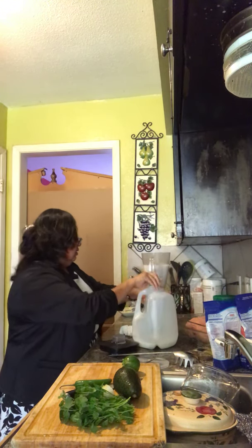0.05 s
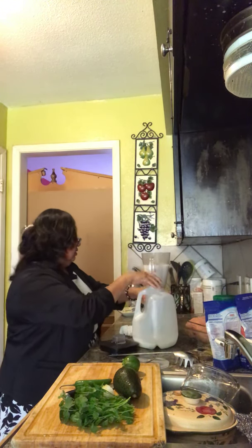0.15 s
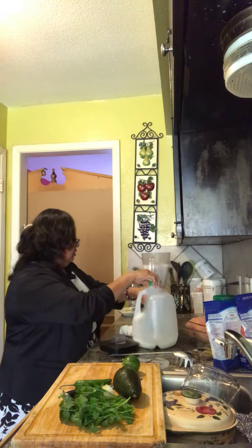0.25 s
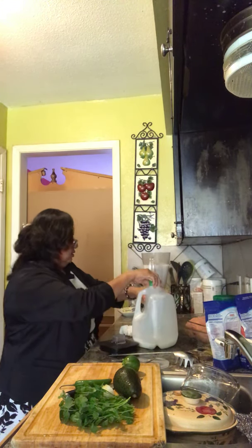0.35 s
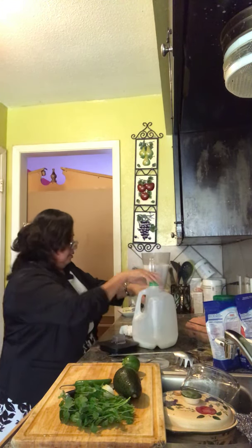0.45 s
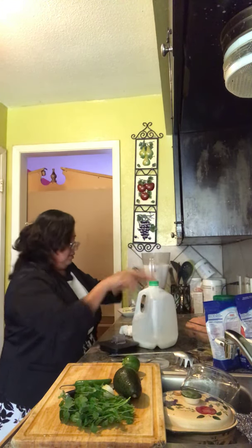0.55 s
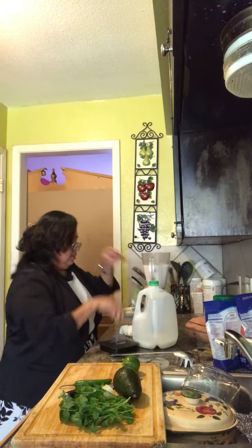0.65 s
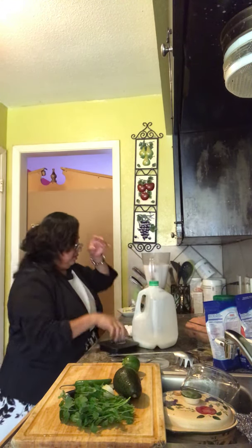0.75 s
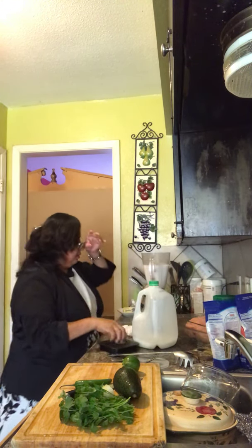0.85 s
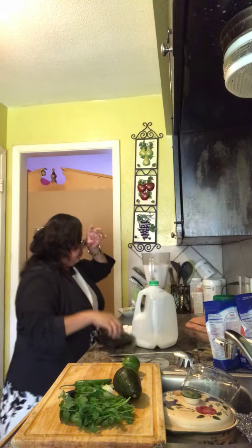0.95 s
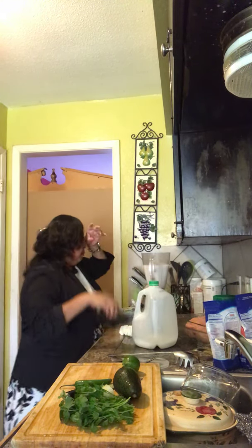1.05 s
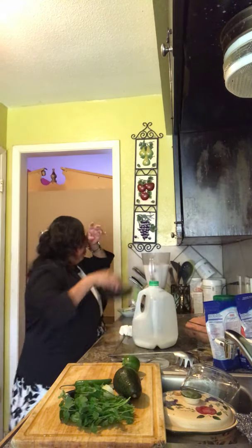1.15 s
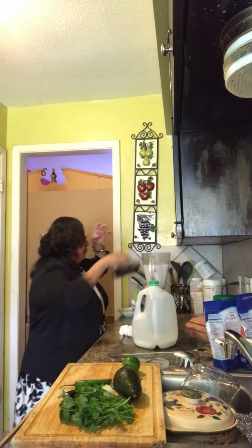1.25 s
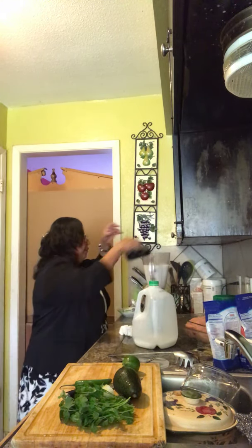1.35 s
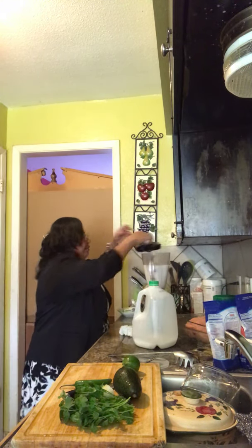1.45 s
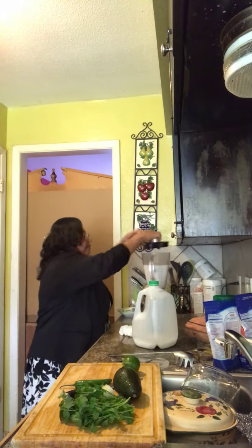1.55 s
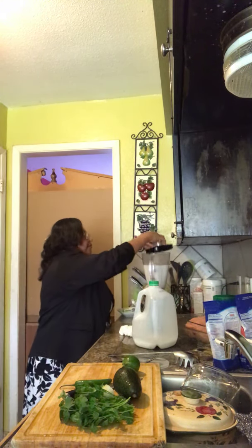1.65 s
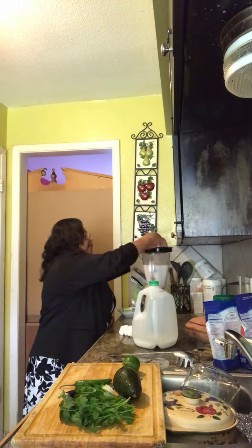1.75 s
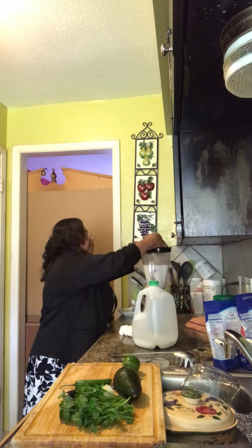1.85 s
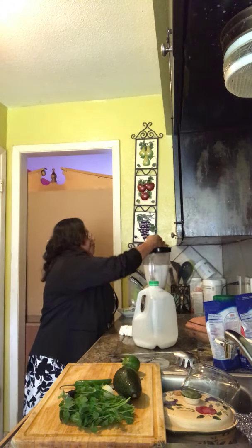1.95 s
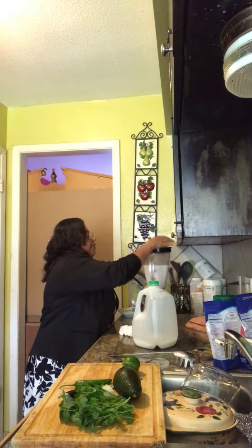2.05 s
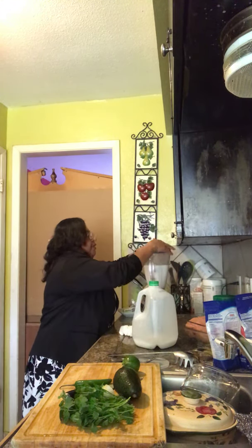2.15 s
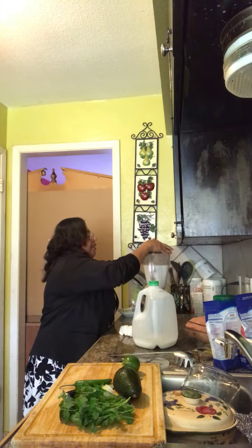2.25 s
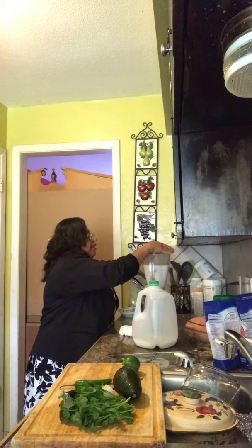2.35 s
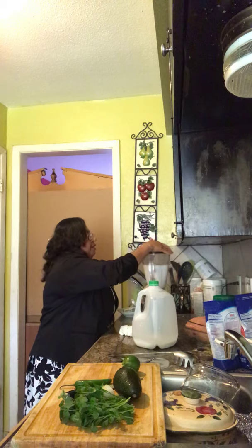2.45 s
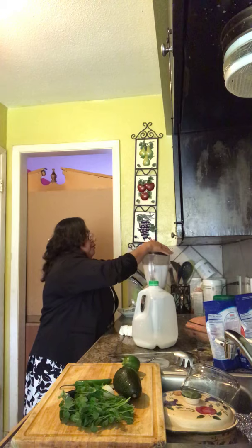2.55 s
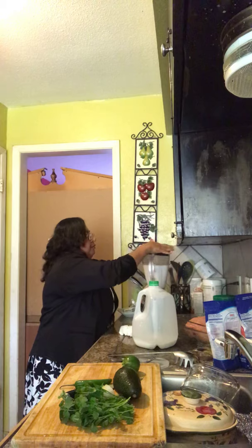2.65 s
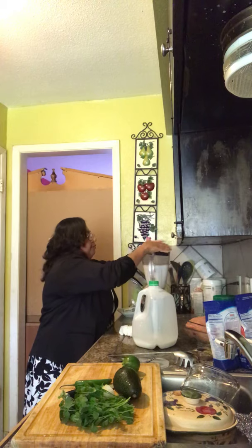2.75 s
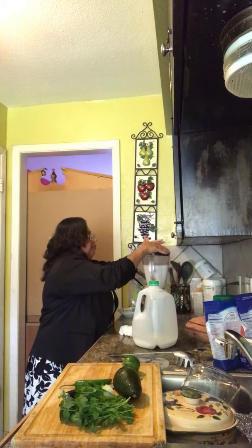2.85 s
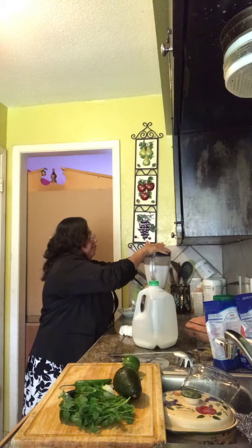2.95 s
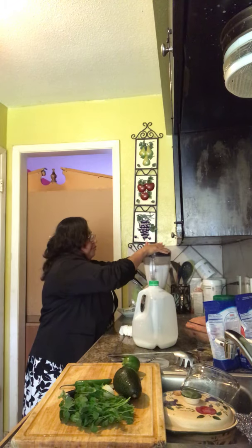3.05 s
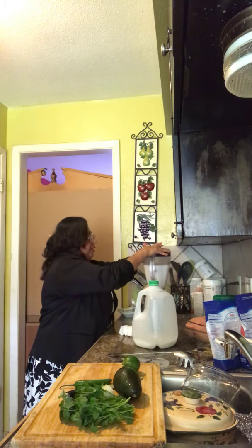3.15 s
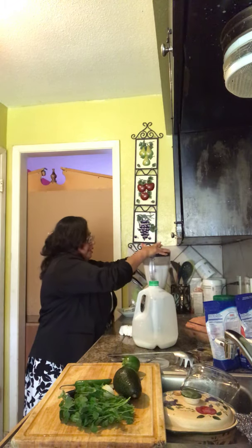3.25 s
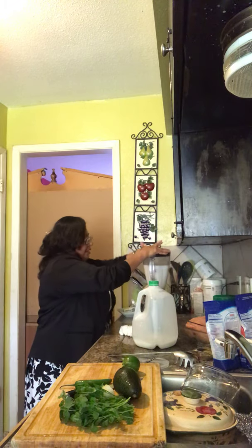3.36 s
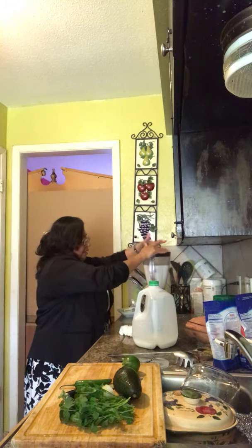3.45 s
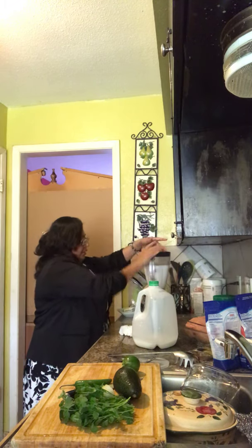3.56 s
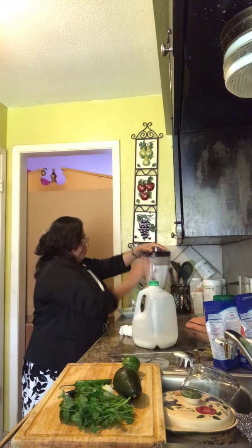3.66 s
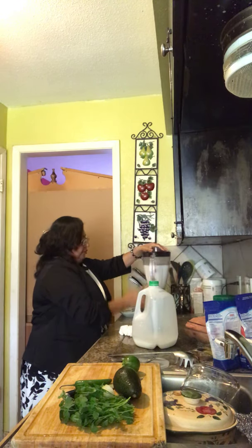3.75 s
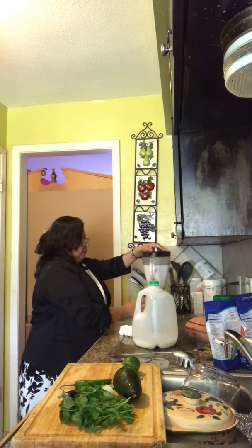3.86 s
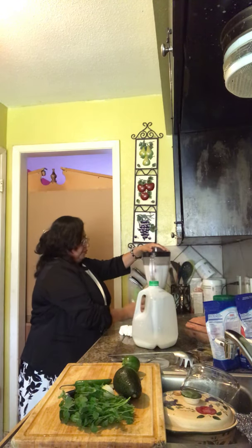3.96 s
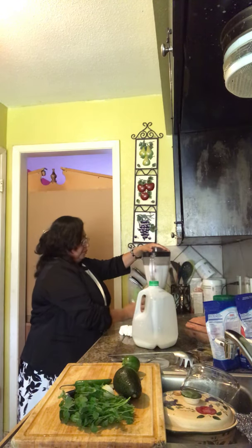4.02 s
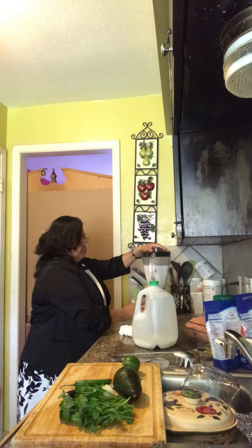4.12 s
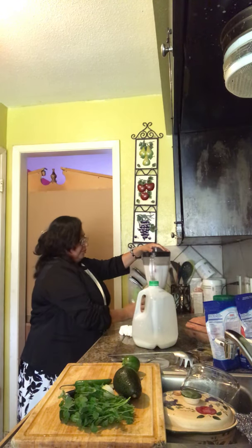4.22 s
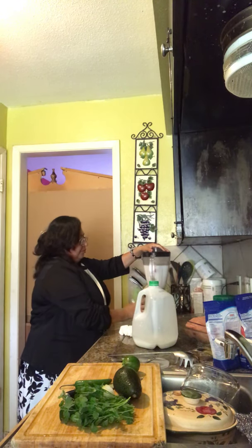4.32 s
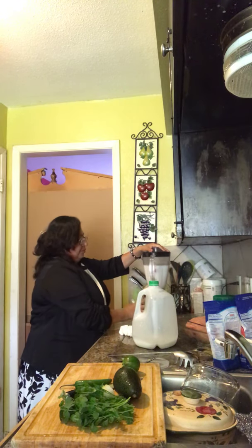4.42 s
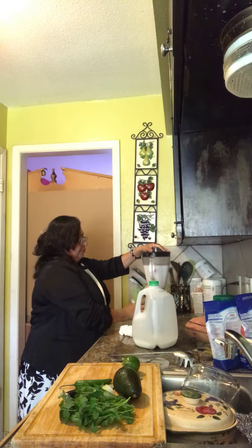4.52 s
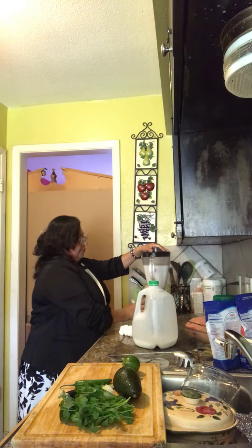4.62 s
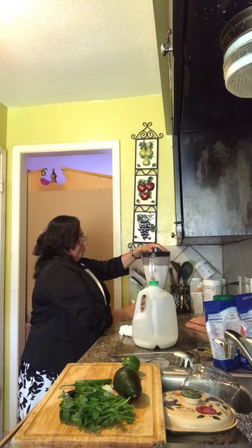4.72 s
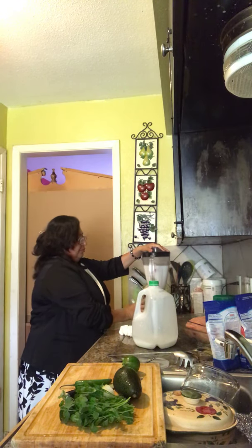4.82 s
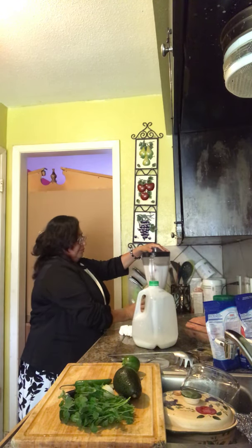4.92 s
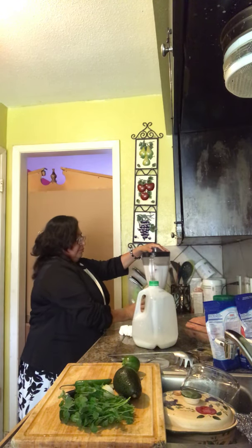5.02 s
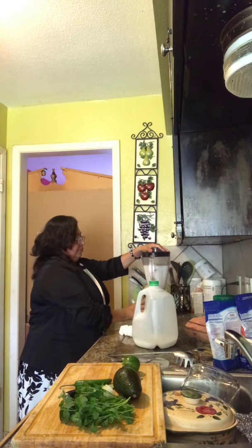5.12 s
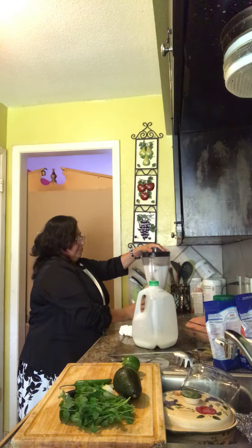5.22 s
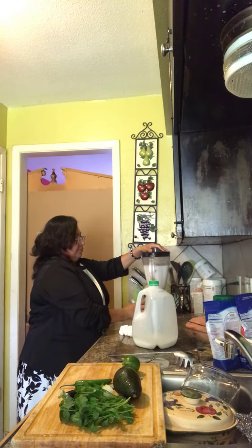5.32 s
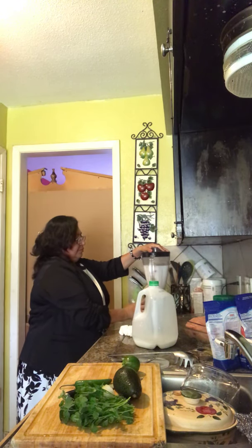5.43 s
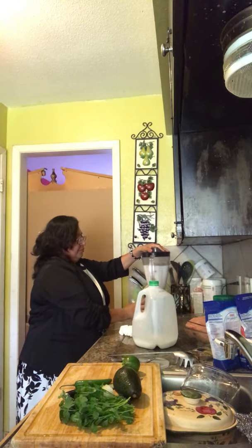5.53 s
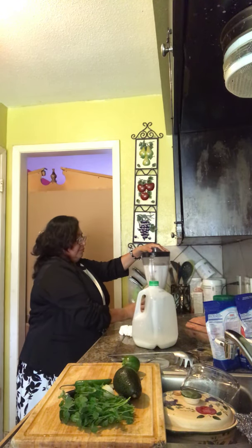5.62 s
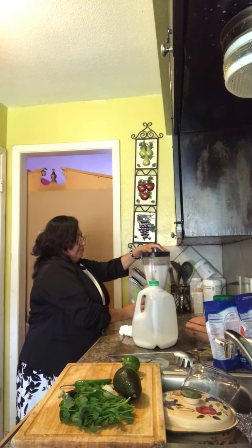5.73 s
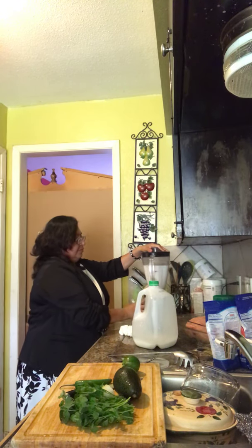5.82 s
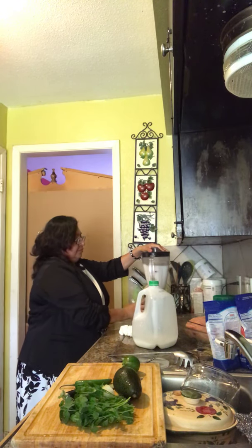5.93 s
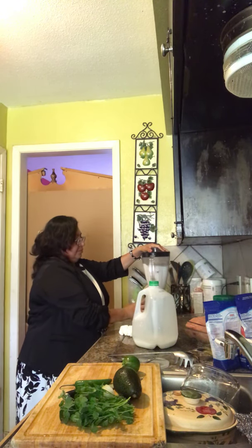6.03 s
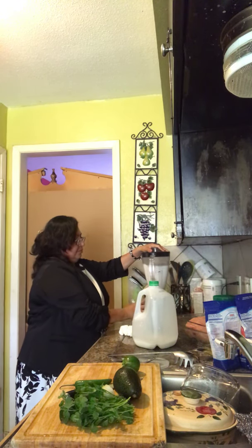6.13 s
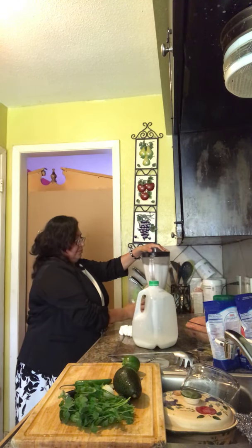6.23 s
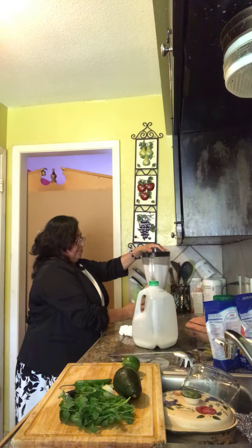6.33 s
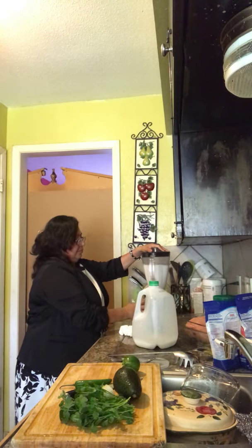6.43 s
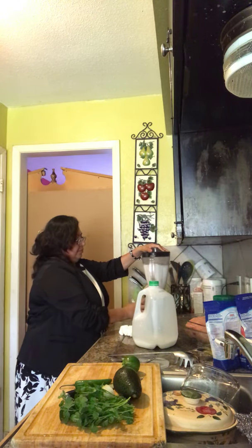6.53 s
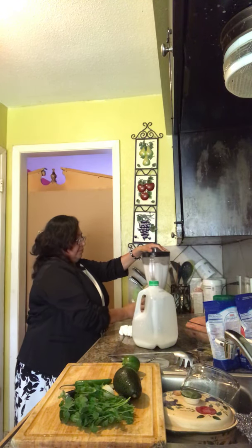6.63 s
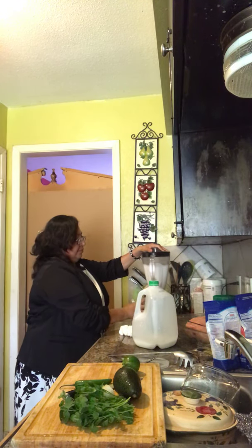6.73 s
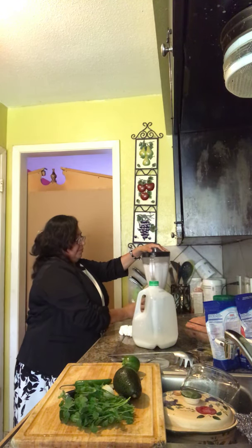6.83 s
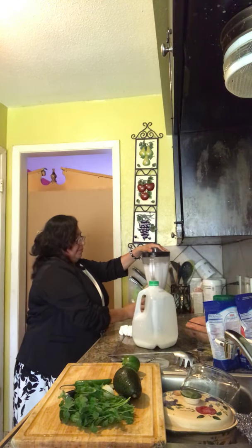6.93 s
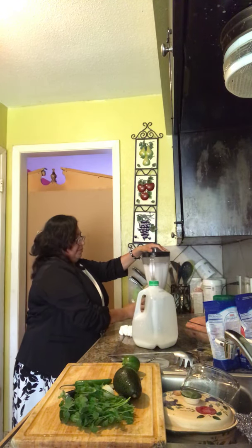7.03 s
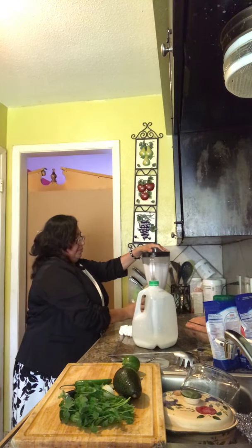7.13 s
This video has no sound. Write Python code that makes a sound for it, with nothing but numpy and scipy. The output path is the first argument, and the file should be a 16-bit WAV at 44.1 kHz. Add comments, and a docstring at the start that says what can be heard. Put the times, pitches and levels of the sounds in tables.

```python
"""A small kitchen, heard by a mono phone microphone. Hands rustle, slide a lid off the worktop and
press it onto a plastic blender jar, which knocks hollowly. Piano-key switches snap and the motor steps
through three speeds: mains buzz, shaft beats, brush whirr in the housing and, loudest at the end,
the blades churning the jar's contents. Under it all, house rumble and a fridge drone."""
import sys
import numpy as np
from scipy import signal
from scipy.fft import rfft, irfft, next_fast_len
from scipy.io import wavfile
from scipy.ndimage import uniform_filter1d

SR = 44100
rng = np.random.default_rng(int(sys.argv[2]) if len(sys.argv) > 2 else 0)


def wav_record(signal):
    """Record a signal, one row per channel, as 16-bit PCM in the file named by sys.argv[1]."""
    frames = np.transpose(np.atleast_2d(signal))
    bounded = np.clip(frames, -1, 1)
    # unit amplitude maps onto the largest positive 16-bit level
    quanta = np.round(bounded * 32767).astype(np.int16)
    wavfile.write(sys.argv[1], SR, quanta)


N = 316638

# power on, three speeds, mix drops onto the blades:
# t/s, settling/s, then level/dB of whirr, churn, buzz, overtones, shaft beat, boom
MOTOR_STEPS = [(4.7, 0.022, -54.5, -46, -46, -55, -44.5, -65),
               (4.79, 0.02, -49.5, -48, -45.5, -59.5, -53.5, -57.5),
               (5.5, 0.029, -43, -41.5, -41.5, -65.5, -40.5, -56.5),
               (6.6, 0.025, -39.5, -34, -39, -63, -36.5, -45.5),
               (6.755, 0.05, -35.5, -25, -50, -60, -40, -38)]
# swells and dips, most as lumps load the blades: t/s, half-width/s, gain/dB of churn, buzz, beat, boom
LOAD_LUMPS = [(5.3, 0.025, 7, 2, 5, 0), (5.46, .05, 6.5, 0, 7, -3), (5.72, 0.018, 2.5, 3.5, 1, 7),
              (5.78, 0.039, 3, -14, -1, 12), (5.87, 0.025, 4.5, 9, 2, 8), (6.32, 0.25, 3.5, -0.5, 1, 3.5),
              (6.74, 0.035, -2.5, -9, -0.5, -1.5), (6.92, 0.12, 0.5, 8, 4.5, 10)]


def motor():
    """Six layers settle to each step's levels; the slow blades labour once a turn until second speed."""
    t = np.arange(N) / SR
    levels_db = np.full((6, N), -90.)  # stopped
    for s, settle_s, *goal_db in MOTOR_STEPS:
        i = int(s * SR)
        goal = np.c_[goal_db]
        levels_db[:, i:] = goal + (levels_db[:, i:i + 1] - goal) * np.exp(-(t[i:] - s) / settle_s)
    for s, width_s, *gain_db in LOAD_LUMPS:
        levels_db[[1, 2, 4, 5]] += np.c_[gain_db] * np.exp(-((t - s) / width_s) ** 2)
    whirr_db, churn_db, buzz_db, overtone_db, beat_db, boom_db = levels_db
    throb_hz, crest_s, second_speed_s = 13.73, 5.3, MOTOR_STEPS[2][0]
    throb = np.cos(2 * np.pi * throb_hz * (t - crest_s)) * (t < second_speed_s)
    return (undb(whirr_db + 2 * throb) * brush_whirr()
            + undb(churn_db) * blade_churn()
            + mains_buzz(buzz_db + 2 * throb, overtone_db + 4 * throb)
            + undb(beat_db) * shaft_beat()
            + undb(boom_db) * jar_boom())


# churn spectrum: f/Hz, density/dB
CHURN_SPECTRUM = [(24, -49), (40, -30), (85, -13), (264, -5), (377, -13), (455, -8), (561, -7),
                  (1190, -2.5), (1410, -2), (2100, -5.5), (2290, -9), (3700, -11), (6000, -22.5),
                  (7800, -52), (13200, -120)]
# loaded jar resonances: f/Hz, width/Hz, gain/dB
FULL_JAR_MODES = [(526, 25, 1), (780, 40, 1), (1195, 70, 2), (1566, 40, 3), (1790, 90, 0), (2046, 45, 4),
                  (2551, 40, 2), (3602, 25, 4), (3848, 40, 3)]


def blade_churn():
    """Blades churn the mix: coarse, flickering noise through the loaded jar."""
    return resonate(colour(grit(3.44), CHURN_SPECTRUM, flicker_db=1.43, rate_hz=70), FULL_JAR_MODES)


# brush spectrum: f/Hz, density/dB
BRUSH_SPECTRUM = [(240, -71), (400, -5), (838, -10), (1180, -6), (2020, -20), (2210, -27), (2540, -13.5),
                  (3980, -8), (4370, -11), (5850, -9.5), (10400, -23), (12500, -18.5), (14500, -23.5),
                  (15900, -30)]
# housing resonances: f/Hz, width/Hz, gain/dB
HOUSING_MODES = [(1570, 90, 1), (2555, 130, 3), (3835, 50, 4), (4120, 60, 3), (4630, 50, -2),
                 (5020, 120, -1), (5630, 40, -1), (5880, 130, 5), (6590, 50, -1), (7110, 45, -1),
                 (7800, 100, 3), (8410, 90, 1), (8940, 160, 0), (13700, 120, -2)]
# whistle envelope: t/s, level/dB re whirr
WHISTLE_LEVELS = [(4.8, -26), (5.45, -22), (5.6, -16.5), (6.5, -15.5), (6.7, -22), (7.18, -25)]


def brush_whirr():
    """Brushes whirr in the housing, with a high whistle on top."""
    whirr = resonate(colour(grit(0.97), BRUSH_SPECTRUM, flicker_db=0.3, rate_hz=25), HOUSING_MODES)
    whistle = unit(band(grit(0.97), 12270, 210))
    return whirr + undb(curve(WHISTLE_LEVELS)) * whistle


# buzz overtones: harmonic number, level/dB
BUZZ_OVERTONES = [(2, 4), (3, 4.5), (4, -9), (5, 8)]


def mains_buzz(buzz_db, overtone_db, buzz_hz=120):
    """The field buzzes at twice the mains frequency; level and phase waver."""
    phase = 2 * np.pi * buzz_hz * np.arange(N) / SR
    overtones = sum(undb(db + 1.7 * walk(60)) * np.sin(k * phase + 0.77 * walk(40))
                    for k, db in BUZZ_OVERTONES)
    fundamental = undb(buzz_db + 2 * walk(25)) * np.sin(phase + .5 * walk(20))
    return fundamental + undb(overtone_db) * overtones


# worktop resonances: f/Hz, width/Hz, level/dB
WORKTOP_MODES = [(64, 9, -2), (167, 37, 2), (274.4, 56, 6)]


def shaft_beat(shaft_hz=40.4):
    """One uneven beat a turn, over a loose rumble, shakes the worktop."""
    turns = np.cumsum(shaft_hz * (1 + 0.01038 * walk(6))) / SR
    beats = np.diff(np.floor(turns), prepend=0) * undb(0.63 * rng.standard_normal(N))
    shake = unit(beats) + undb(3.5) * rng.standard_normal(N)
    return unit(sum(undb(db) * steep(shake, hz, 1.5 * width) * np.sqrt(50 / width)
                    for hz, width, db in WORKTOP_MODES))


def jar_boom():
    """The air over the mix booms in one low band."""
    return unit(steep(grit(3.0), 451, 109))


# finger taps and switch snaps: t/s, level/dB, f/Hz, thump/dB rel., snap/dB rel., t60/s
BASE_CLICKS = [(0.172, -49, 2140, -19, -16, 0.045), (0.2833, -50, 1400, -24, -6, 0.08),
               (3.4639, -48.5, 1690, 2, -6, 0.048), (3.523, -56, 1200, -21, -11, 0.067),
               (3.601, -57, 1980, -13, 2, 0.098), (3.8364, -60, 1150, -4, -0.5, 0.2),
               (3.9303, -46, 1560, -6, -9, 0.046), (3.953, -60, 1500, -15, -25, 0.036),
               (3.973, -50.5, 1900, -16, -9, 0.052), (4.0123, -35, 1290, -36, -36, 0.036),
               (4.186, -52, 3520, -22, -16, 0.081), (4.2215, -43, 3300, -18, -8, 0.047),
               (4.243, -53, 3550, -20, -20, 0.05), (4.361, -46.5, 1900, -3, -12, 0.045),
               (4.435, -47, 1550, -23, -27, 0.049), (4.636, -48, 1580, -10, -25, 0.046),
               (4.691, -37, 2120, -5, -1, 0.096), (4.704, -36.5, 3020, -19, -2, 0.059),
               (4.712, -29, 1170, -7, -27, 0.053), (4.782, -22.5, 3620, -1.5, 2.5, 0.058),
               (5.4991, -18, 2340, -12.5, -4.5, 0.033), (5.506, -24.5, 2070, -6, -1, 0.05),
               (5.7244, -29, 2400, -18, -20, 0.067), (6.5945, -19, 1440, -6.5, 0.5, 0.04)]
# motor base resonances: f/Hz, width/Hz, gain/dB
BASE_MODES = [(553, 360, 12), (1120, 60, 5), (1560, 140, 7.5), (2620, 150, 3.5), (3510, 62, -5.5),
              (5150, 430, -3.5)]
# ringing keys and plastic parts: t/s, peak/dB, f/Hz, t60/s
KEY_PINGS = [(3.931, -53, 1540, 0.02), (4.014, -45, 1150, .015), (4.243, -52, 3560, 0.027),
             (4.436, -46, 1480, 0.014), (4.637, -50, 1630, .012), (4.7828, -19, 1610, 0.014),
             (5.4995, -25, 1630, .015), (5.723, -33, 2040, .02), (6.5945, -27, 3850, .012)]


def clicks():
    """Taps and switches rattle the plastic base and thump the worktop; small parts ping."""
    out = np.zeros(N)
    thump = blow([(314, 0, 0.081)], push_s=0.005)
    for s, db, hz, thump_db, snap_db, t60_s in BASE_CLICKS:
        rattle = burst(t60_s, rise_s=0.0018)
        body = steep(rattle, hz, 2 * hz) + steep(rattle, hz, 0.33 * hz)
        clack = undb(-1.5) * body + undb(snap_db) * band(rattle, 2300, 5800)
        base = sum(undb(gain_db) * band(clack, f, width) for f, width, gain_db in BASE_MODES)
        add(out, s, undb(db) * (clack + undb(-3.5) * base + undb(thump_db) * thump))
    for s, db, hz, t60_s in KEY_PINGS:
        add(out, s, undb(db) * blow([(hz, 0, t60_s)], push_s=0.0016))
    return out


# lid and hand on the jar: t/s, level/dB, hollow f/Hz, thud/dB rel., crack/dB rel.
JAR_KNOCKS = [(0.428, -36, 674, -9.5, -27), (0.693, -40.5, 500, -2, -27), (0.773, -42, 607, -5.5, -13),
              (0.853, -46, 515, -24, -28), (0.896, -43, 602, -17, -18), (1.717, -34.5, 650, -5.5, -23),
              (1.75, -20.5, 639, -36, -48), (1.775, -38, 683, -22, -31), (1.808, -33.5, 674, -23, -21),
              (1.85, -33.5, 633, -22, -27), (1.866, -25, 597, -14, -31), (1.889, -36, 660, -22, -29),
              (1.924, -40, 630, -22, -28), (2.045, -32, 626, -11, -31), (2.071, -42, 660, -27, -27),
              (2.228, -34.5, 610, -27, -10.5), (2.269, -39, 606, -5.5, -15), (2.312, -34.5, 575, -4, -30),
              (2.475, -39.5, 510, -12, -9), (2.485, -33.5, 602, -11, -28), (2.509, -34, 470, -18, -30),
              (2.525, -25.5, 640, -9, -19.5), (2.545, -33.5, 633, -20, -28), (2.565, -28.5, 617, -7.5, -30),
              (2.706, -36, 396, -18, -23), (2.948, -33.5, 570, 1.5, -23), (2.966, -36, 620, -3, -20),
              (2.99, -34, 660, -6, -11), (3.166, -44, 640, 1, 0), (3.398, -44, 445, 0, -6),
              (3.703, -37, 484, -2, -16)]
# jar modes: ratio to hollow pitch, level/dB, t60/s
JAR_MODES = [(.97, 11.5, 0.011), (1.04, -11, 0.073), (1.0, 6, 0.026), (.45, -4, 0.04), (.75, -21, 0.03),
             (1.8, -20, 0.014), (2.55, -15, 0.02)]


def knocks(palm_s=.012):
    """Soft, scuffing blows ring the air and walls of the jar; each hold gives another pitch."""
    out = np.zeros(N)
    for s, db, hz, thud_db, crack_db in JAR_KNOCKS:
        ring = blow([(hz * ratio, mode_db, t60_s) for ratio, mode_db, t60_s in JAR_MODES], palm_s)
        ring *= undb(-1.5 - .7 * max(thud_db + 16, 0))  # a flat hand thuds more and damps the ring
        scuff = undb(7) * band(burst(0.038, palm_s / 2), hz, 320)
        thud = undb(thud_db) * peak(steep(burst(0.081, palm_s / 2), 350, 590))
        crack = undb(crack_db) * peak(steep(burst(0.023, 0.0013), 3600, 8300))
        add(out, s - .6 * palm_s, undb(db) * (ring + scuff + thud))  # the palm presses before the crack
        add(out, s, undb(db) * crack)
    return out


# hand, sleeve and lid strokes: peak t/s, rise/s, fall/s, level/dB, f/Hz, sizzle/dB rel., drag/dB rel.
RUB_STROKES = [(0.02, 0.14, 0.14, -61, 3850, -14, -1), (0.11, 0.082, 0.082, -62, 3600, -17, 3),
               (0.18, .05, .06, -70, 3500, -19, -7), (0.3, 0.065, 0.063, -53.5, 3460, -18, -2.5),
               (0.42, 0.03, 0.11, -59.5, 3900, -16, 6), (0.5, 0.058, 0.045, -63, 3650, -11, -6),
               (0.6, 0.086, 0.11, -63.5, 4600, -13, -7), (0.9, 0.08, 0.045, -61.5, 3360, -16, 0),
               (1.22, 0.037, 0.35, -58, 3000, -13, -6), (1.3, 0.11, 0.2, -62, 5400, -10, 0),
               (1.56, 0.1, 0.18, -58.5, 4630, -7, -5), (1.62, 0.16, 0.076, -53, 4930, -8, -3),
               (1.863, 0.017, 0.045, -50, 4800, -17, 7), (1.9, .05, 0.25, -66, 4000, -18, 2),
               (2.06, 0.092, 0.16, -67, 3450, -21, 7), (2.15, 0.076, 0.26, -65, 3400, -9, -3),
               (2.222, 0.01, 0.03, -56, 5200, -2, 6), (2.32, .1, .07, -69, 3400, -12, -2),
               (2.52, 0.14, 0.18, -62.5, 4020, -9, 4), (2.79, .012, 0.033, -65, 5380, -8, -14),
               (2.955, 0.02, 0.073, -49.5, 4840, -12, 0), (3.0, .03, 0.071, -55, 4170, -19, -2),
               (3.085, 0.042, 0.17, -56, 5400, -10, -1), (3.17, 0.016, 0.079, -51.5, 3970, -11, -1),
               (3.27, .1, .3, -65, 4000, -12, -3), (3.36, 0.11, 0.048, -58, 3600, -18, -1),
               (3.402, 0.0079, 0.063, -55.5, 4500, -16, -1.5), (3.447, 0.0089, .06, -55, 5000, -4, -8),
               (3.47, .01, 0.055, -56.5, 5000, -10, -3), (3.497, .01, .06, -55, 5000, -6, -7),
               (3.527, 0.022, 0.054, -55, 5000, -9, -2.5), (3.577, 0.0093, .06, -57.5, 4800, -6, -5),
               (3.605, .01, 0.066, -58.5, 4600, -8, -1.5), (3.7, .015, 0.086, -58, 5250, -12, -6),
               (3.85, 0.12, 0.3, -67, 3870, -16, 2)]


def rustle(slope_db=20, rounding=.3):
    """Cloth and skin friction: strokes of crackling noise, with sizzle above and drag below."""
    s, rise_s, fall_s, db, hz, sizzle_db, drag_db = np.transpose(RUB_STROKES)[:, :, None]
    t = np.arange(N) / SR - s
    from_peak = np.maximum(-t / rise_s, t / fall_s)
    swells = undb(db - 3 - slope_db * (np.hypot(from_peak, rounding) - rounding))

    def envelope(gain_db):
        """Power sum of the strokes, each at its own gain."""
        return np.sqrt(undb(2 * gain_db).T @ swells ** 2)[0]

    rub = sum(envelope(-4 - 20 * np.log2(hz / f) ** 2) * unit(steep(grit(2.3), f, 0.81 * f))
              for f in 2100 * 1.32 ** np.arange(5))
    sizzle = envelope(sizzle_db) * unit(steep(grit(4.3), 13300, 6200))
    drag = envelope(drag_db) * unit(steep(grit(2.6), 1040, 1280))
    flicker = undb(.4 * walk(30) + walk(130))
    return flicker * (rub + sizzle + drag)


# lid resonances: f/Hz, width/Hz, gain/dB
LID_MODES = [(4800, 1400, 0), (5750, 1400, -1), (3030, 600, -3)]


def lid_slide(peak_s=1.277, rise_s=0.065, fall_s=0.1, level_db=-58):
    """The lid slides off the worktop: a smooth hiss through its resonances."""
    t = np.arange(N) / SR - peak_s
    swell = np.exp(-(t / np.where(t < 0, rise_s, fall_s)) ** 2)
    hiss = sum(undb(db) * steep(rng.standard_normal(N), hz, width) for hz, width, db in LID_MODES)
    return undb(level_db) * swell * unit(hiss)


# rumble and hiss spectrum: f/Hz, density/dB
ROOM_SPECTRUM = [(15, -57), (25, -9), (87, -4.5), (161, 1), (190, -9.5), (300, -11.5), (335, -16),
                 (427, -20), (623, -17.5), (752, -22.5), (1160, -24.5), (2040, -31), (7280, -42.5),
                 (15900, -53.5)]
# fridge drone: f/Hz, width/Hz, level/dB
FRIDGE_BANDS = [(155.4, 15, -60), (296.2, 11.6, -60.5)]
# whine envelope: t/s, level/dB
WHINE_LEVELS = [(0, -96), (3.6, -93), (4.1, -80), (4.7, -81)]


def room_tone(floor_db=-52, whine_hz=4740):
    """House rumble, microphone hiss, a fridge droning in narrow bands and a faint thin whine."""
    drone = sum(undb(db) * unit(band(rng.standard_normal(N), hz, width))
                for hz, width, db in FRIDGE_BANDS)
    whine = undb(curve(WHINE_LEVELS) + 3 * walk(23)) * np.sin(2 * np.pi * whine_hz * np.arange(N) / SR)
    floor = colour(rng.standard_normal(N), ROOM_SPECTRUM, flicker_db=0.59, rate_hz=7.5)
    return undb(floor_db) * floor + drone + whine


def undb(db):
    """dB to gain."""
    return 10 ** (np.asarray(db) / 20)


def unit(x):
    """Scaled to rms 1."""
    return x / np.sqrt(np.mean(x ** 2))


def peak(x):
    """Scaled to peak 1."""
    return x / abs(x).max()


def band(x, hz, width_hz):
    """Resonance, gain 1 at centre."""
    return signal.lfilter(*signal.iirpeak(hz, hz / width_hz, fs=SR), x)


def steep(x, hz, width_hz):
    """Resonance applied twice, for steeper flanks."""
    return band(band(x, hz, width_hz), hz, width_hz)


def resonate(x, modes):
    """Input plus its resonances; rms 1."""
    return unit(x + sum(undb(db) * band(x, hz, width) for hz, width, db in modes))


def walk(rate_hz):
    """Random steps, smoothed twice; spread near 1."""
    hold = int(SR / rate_hz)
    steps = np.repeat(rng.standard_normal(N // hold + 1), hold)
    return 1.496 * uniform_filter1d(uniform_filter1d(steps, hold), hold)[:N]


def curve(points):
    """(t/s, value) points interpolated per sample."""
    return np.interp(np.arange(N) / SR, *np.transpose(points))


def colour(x, spectrum, flicker_db, rate_hz):
    """Spectral shaping with independent level flicker per octave; rms 1."""
    size = next_fast_len(N)
    hz = np.arange(1, size // 2 + 2) * SR / size
    point_hz, point_db = np.transpose(spectrum)
    shaped = rfft(x, size) * undb(np.interp(np.log(hz), np.log(point_hz), point_db))
    octave = np.log2(hz / 60).clip(0, 8)
    parts = (irfft(shaped * (1 - abs(octave - k)).clip(0), size)[:N] for k in range(9))
    return unit(sum(undb(flicker_db * walk(rate_hz)) * part for part in parts))


def grit(scatter_db):
    """Dense noise with occasional larger grains; rms 1."""
    return unit(rng.standard_normal(N) * undb(scatter_db * rng.exponential(size=N).clip(0, 5)))


def blow(modes, push_s):
    """Modes (f/Hz, level/dB, t60/s) swell during the push, then decay; peak 1."""
    t = np.arange(SR // 4) / SR
    released_s = (t - push_s).clip(0)
    ring = sum(undb(db) * np.sin(2 * np.pi * hz * t) * 1000. ** (-released_s / t60_s)
               for hz, db, t60_s in modes)
    return peak(ring * np.sin(np.pi / 2 * (t / push_s).clip(0, 1)) ** 2)


def burst(t60_s, rise_s):
    """White noise, fast rise, exponential decay."""
    t = np.arange(SR // 4) / SR
    return rng.standard_normal(len(t)) * 1000. ** (-t / t60_s) * (1 - np.exp(-t / rise_s))


def add(out, s, x):
    """Mixes x into out at time s."""
    i = int(s * SR)
    out[i:i + len(x)] += x[:N - i]


def scene():
    """Knocks and clicks echo off the tiles; steady sounds carry the room in their spectra."""
    hits = knocks() + clicks()
    room = band(burst(t60_s=0.28, rise_s=0.001), 1600, 13700)
    echo = signal.fftconvolve(hits, room / np.sqrt(np.sum(room ** 2)))[:N]
    return np.tile(hits + undb(-6) * echo + rustle() + lid_slide() + motor() + room_tone(), (2, 1))


def record(dry):
    """Phone microphone: bass cut, dip at its port, soft clipping, steep top cut."""
    x = signal.sosfilt(signal.butter(3, 48, "high", fs=SR, output="sos"), dry)
    x = x - 0.23 * band(x, 10250, 510)
    x = np.tanh(1.593 * x) / 1.415
    return signal.sosfilt(signal.ellip(10, .2, 80, 15830, fs=SR, output="sos"), x)


dry = scene()
out = record(dry)
wav_record(out)
```